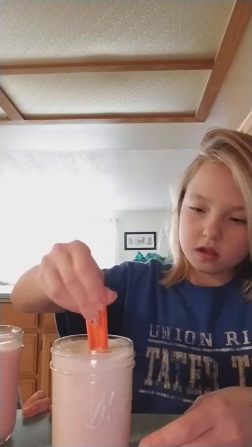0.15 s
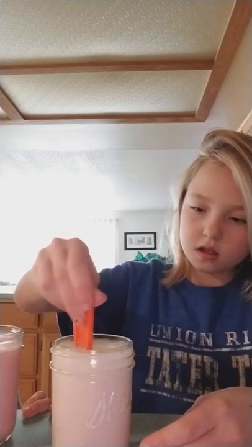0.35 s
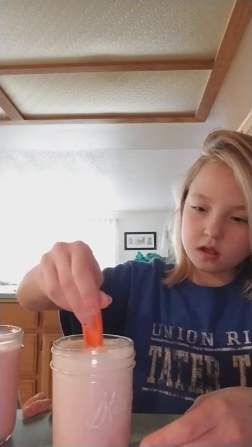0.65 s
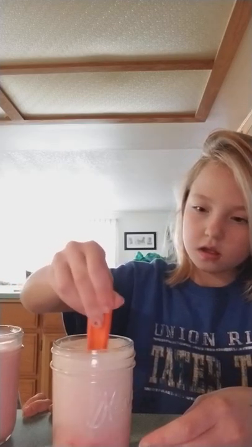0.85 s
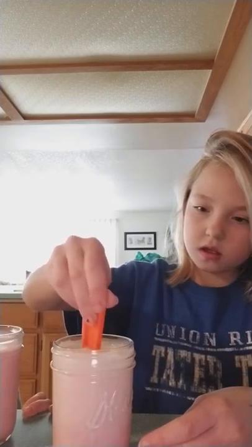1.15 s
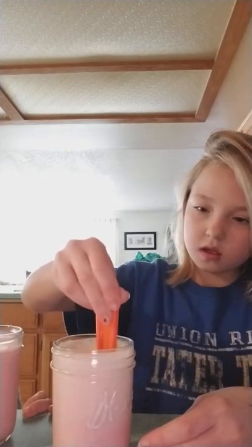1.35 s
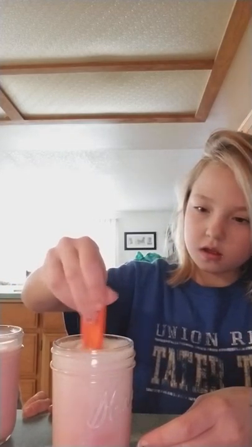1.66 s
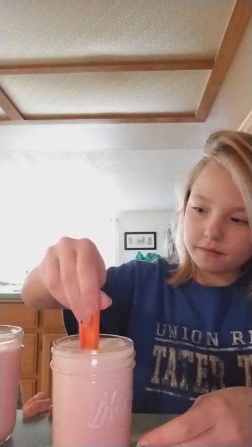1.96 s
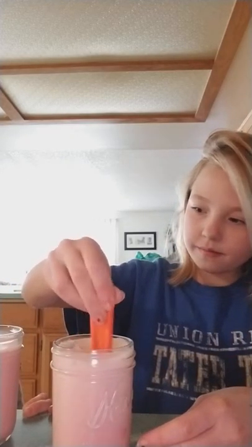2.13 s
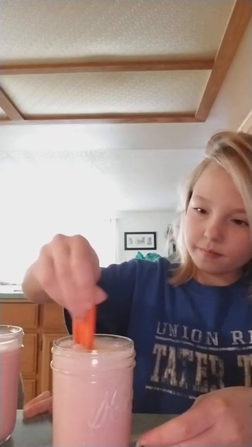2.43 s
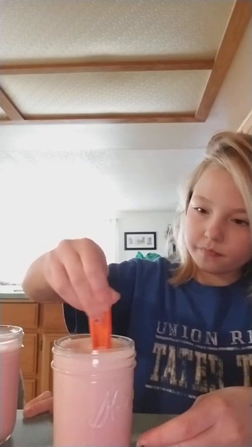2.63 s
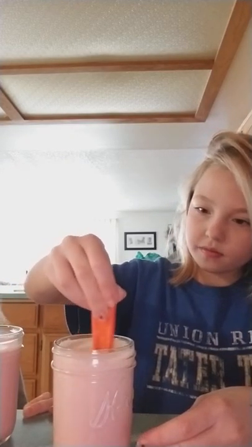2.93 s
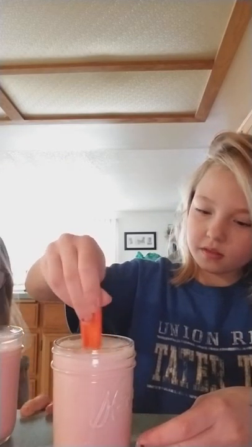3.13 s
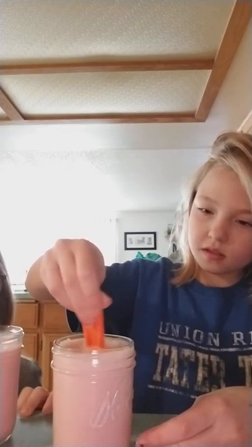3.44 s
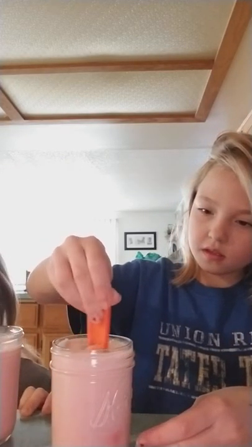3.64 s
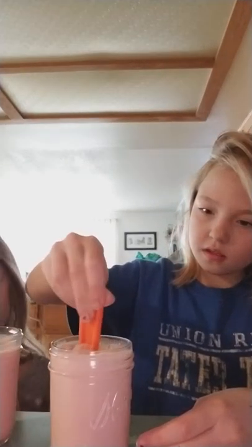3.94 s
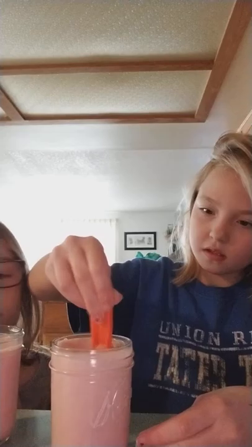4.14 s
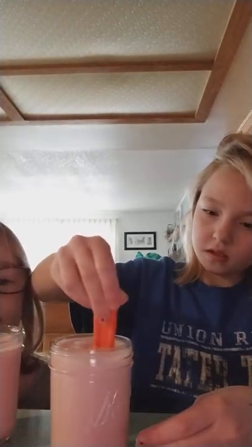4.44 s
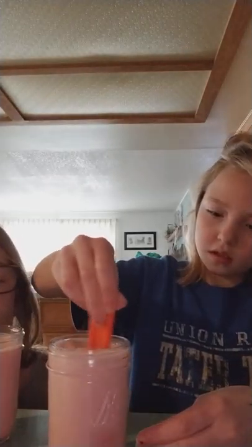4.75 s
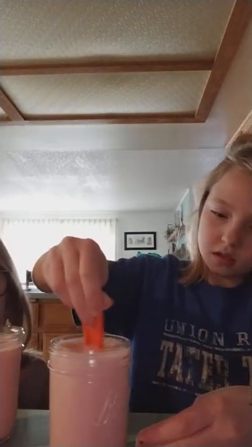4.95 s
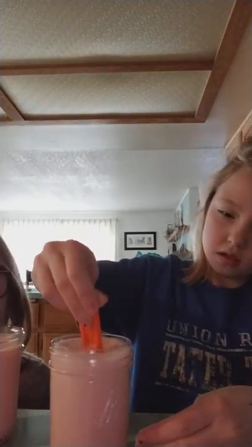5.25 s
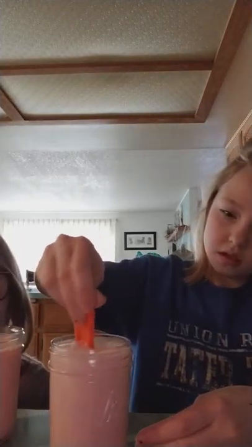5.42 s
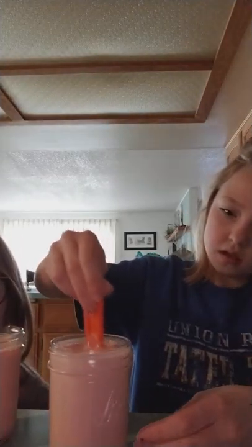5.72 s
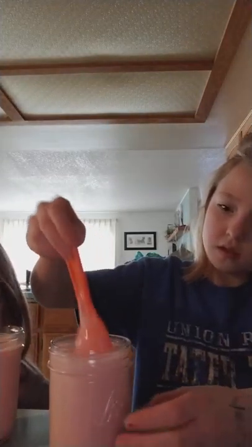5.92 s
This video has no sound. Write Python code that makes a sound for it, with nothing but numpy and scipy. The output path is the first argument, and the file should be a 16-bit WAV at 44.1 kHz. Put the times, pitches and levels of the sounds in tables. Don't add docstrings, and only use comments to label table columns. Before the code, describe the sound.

A plastic spoon stirs a milk-filled glass jar, clacking about five times a second, in a quiet, faintly rumbling kitchen.

```python
import sys
import numpy as np
from scipy import signal
from scipy.fft import rfft, irfft
from scipy.io import wavfile

SR = 44100
rng = np.random.default_rng(int(sys.argv[2]) if len(sys.argv) > 2 else 0)


def to_wav(sig):
    pcm = np.clip(np.atleast_2d(sig), -1, 1) * 32767
    pcm = np.round(pcm).astype(np.int16)
    wavfile.write(sys.argv[1], SR, pcm.T)


def convert_level_to_amplitude(level_db):
    exponent = np.asarray(level_db, float) / 20
    return 10 ** exponent


N = 268128


def clicks(s, gains):
    out = np.full(N, 1e-18)
    np.add.at(out, np.round(np.asarray(s) * SR).astype(int), gains)
    return out


def ring(x, hz, t60):
    r = convert_level_to_amplitude(-60 / (t60 * SR))
    w = 2 * np.pi * hz / SR
    return signal.lfilter([0, np.sin(w)], [1, -2 * r * np.cos(w), r * r], x)


def resonances(x, table):
    out = 0
    for k, (hz, width_hz, db) in enumerate(table):
        r = np.exp(-np.pi * width_hz / SR)
        poles = [1, -2 * r * np.cos(2 * np.pi * hz / SR), r * r]
        peak = signal.lfilter([(1 - r * r) / 2, 0, (r * r - 1) / 2], poles, x)
        out = out + (-1) ** k * convert_level_to_amplitude(db) * peak
    return out


def swell(x, rise_s):
    r = np.exp(-1 / (rise_s * SR))
    return signal.lfilter([(1 - r) ** 2], [1, -2 * r, r * r], x)


def scuff(s, db, tick_db, fast_s, slow_s, slow_db):
    hit = swell(clicks(s, convert_level_to_amplitude(db)), 0.00027)
    fast, slow = [signal.lfilter([1], [1, -np.exp(-1 / (tau * SR))], hit) for tau in (fast_s, slow_s)]
    noise = (fast + convert_level_to_amplitude(slow_db) * slow) * rng.standard_normal(N)
    return noise + clicks(s + 0.00065, convert_level_to_amplitude(db + tick_db))


def colour(x, points):
    hz, db = np.transpose(points)
    grid = np.maximum(np.arange(2049) * SR / 4096, 1)
    cepstrum = irfft(np.log(convert_level_to_amplitude(np.interp(np.log(grid), np.log(hz), db))))
    cepstrum[1:2048] *= 2
    cepstrum[2049:] = 0
    return signal.fftconvolve(x, irfft(np.exp(rfft(cepstrum))))[:N]


def wobble(size, rate_hz):
    knots = rng.standard_normal(int(size * 400 / SR) + 2)
    return np.interp(np.arange(size) * np.clip(rate_hz, 10, 400) / SR, np.arange(len(knots)), knots)


def struck(notes, rise_s, rough, t):
    sound = 0
    for hz, db, t60 in notes:
        sway = 1 + rough * wobble(len(t), 170) * (1 - np.exp(-t / 0.0013))
        sound = sound + convert_level_to_amplitude(db - 60 * t / t60) * sway * np.sin(2 * np.pi * (hz * t + rng.random()))
    return sound * (1 - np.exp(-t / rise_s))


def burst(s, length, rise_s, fall_s):
    t = np.arange(N) / SR
    rise = 1 + np.exp((s - t).clip(-.3, .3) / rise_s * 4)
    fall = 1 + np.exp((t - s - length).clip(-.3, .3) / fall_s * 4)
    return 1 / rise / fall


def looked_up(table, s, plain):
    out = np.tile(np.array(plain, float), (len(s), 1))
    for row_s, *values in table:
        out[np.argmin(abs(s - row_s))] = values
    return out


# [t/s, level/dB]
MOVING = [(0.0, -62.5), (0.46, -63), (0.64, -71.5), (1.29, -72.5), (1.44, -71), (2.15, -69.5), (2.3, -58.5),
          (2.52, -73), (2.68, -76.5), (2.83, -59), (3.3, -62.5), (3.73, -59), (4.2, -62), (4.57, -61.5),
          (5.57, -64), (5.96, -65.5), (6.08, -69)]
# [f/Hz, level/dB per Hz]
AIR_LEFT = [(30, -11), (45, 0.5), (70, -5.5), (100, -3), (200, 3), (450, -15), (1100, -26), (1500, -26.5),
            (4000, -24.5), (8000, -33), (9300, -15.5), (11000, -21.5), (15500, -18)]
AIR_RIGHT = [(30, -0.5), (200, -8), (340, -10.5), (425, -2), (520, -4.5), (1100, -19), (1400, -17),
             (2500, -12), (4000, -18.5), (6000, -8), (7400, -31), (9600, -13), (11700, -18.5), (15500, -16)]


def air():
    self_noise_db = -75.5
    moving_db = np.interp(np.arange(N) / SR, *np.transpose(MOVING))
    shared, left, right = rng.standard_normal((3, N))
    rumble = convert_level_to_amplitude(moving_db + 2.2 * wobble(N, 11))
    slosh = convert_level_to_amplitude(-72.5 + 1.5 * (moving_db + 62.5) + 4 * wobble(N, 25))
    hiss = convert_level_to_amplitude(-71 + 0.68 * (moving_db + 63.5))
    low, mid, high, top = [signal.butter(4, hz, kind, fs=SR, output="sos") for hz, kind in
                           ((330, "low"), ([330, 900], "band"), ([900, 8000], "band"), (8000, "high"))]
    house = colour(shared, AIR_LEFT)
    out = []
    for own, points in ((left, AIR_LEFT), (right, AIR_RIGHT)):
        port = colour(own, points)
        steady = signal.sosfilt(top, port)
        out.append(signal.sosfilt(low, house + port * 0.53) * rumble * convert_level_to_amplitude(20.0)
                   + signal.sosfilt(mid, port) * slosh * convert_level_to_amplitude(26.5)
                   + signal.sosfilt(high, port) * hiss * convert_level_to_amplitude(24.0)
                   + steady / steady.std() * convert_level_to_amplitude(self_noise_db))
    return np.array(out)


# [f/Hz, level/dB, T60/s]
LEFTOVER = [(708, -27.5, 0.047), (422, -33.5, 0.17), (2020, -41.5, 0.27)]


def earlier_ring():
    return sum(ring(clicks([0], convert_level_to_amplitude(db)), hz, t60) for hz, db, t60 in LEFTOVER)


# [t/s, level/dB, wall ring level/dB, lean from handle to bowl/dB, note f/Hz]
FAR = [(0.222, -18, -52, 19.5, 3110), (.601, -18, -35.5, -34.5, 1590), (1.0155, -18.5, -40.5, 27.5, 2540),
       (1.45, -22, -34.5, 14.5, 1445), (1.8504, -22, -32, 6.5, 1280), (2.278, -17, -29.5, 14.5, 3260),
       (2.676, -17, -44, 12.5, 3000), (3.0582, -17, -30, 25, 2570), (3.4257, -17.5, -39, 13, 2570),
       (3.805, -20.5, -34, -8, 1430), (4.1885, -15.5, -70, 36, 3330), (4.5506, -18, -29, 9, 2130),
       (4.9126, -15, -25.5, 8.5, 2570), (5.3023, -16.5, -46, 7.5, 2860)]
# [t/s, level/dB, wall ring level/dB, lean/dB, note f/Hz]
NEAR = [(0.0237, -39.5, -40, -18.5, 680), (0.4105, -25.5, -35.5, 9, 2440), (0.845, -52.5, -53, -21, 1380),
        (1.2181, -34.5, -44.5, -5, 1022), (1.6512, -35.5, -36, -6, 3210), (2.0588, -32, -44.5, 2, 783),
        (2.4982, -30, -29, -3, 1343), (2.8629, -28.5, -31, -2, 2630), (3.2719, -35.5, -39.5, 2.5, 2540),
        (3.5988, -29, -30, -1, 4030), (4.0111, -32, -36, 2, 2630), (4.3899, -31.5, -56, -3, 3420),
        (4.7386, -23, -47, 4.5, 2050), (5.106, -38.5, -45.5, 2.5, 2990), (5.4951, -29, -39, -6, 915),
        (5.7012, -43.5, -56.5, -13, 1182)]
# [t/s, level/dB, wall ring level/dB, lean/dB, note f/Hz]
BOUNCES = [(0.0697, -54, -64.5, 10, 3190), (0.1173, -40.5, -30.5, -16.5, 706),
           (0.4553, -32.5, -37, 12, 2260), (0.9007, -54.5, -50.5, -8, 1240),
           (1.276, -36.5, -43.5, -24, 1210), (1.6937, -39, -36, -19, 853), (1.7225, -48, -56, 11, 2680),
           (2.0938, -34, -52, -1.5, 834), (2.5322, -30, -63, 1, 3010), (2.5542, -40.5, -71, 4.5, 850),
           (2.8919, -33.5, -42.5, -10, 1120), (3.2997, -44.5, -61, -27, 850), (3.6359, -36, -65, -22, 1010),
           (4.4142, -43, -39, -27, 1200), (4.7729, -29, -39.5, -1, 1010), (5.5425, -33, -63, -2, 2880),
           (5.5649, -38.5, -73, 0, 3220)]
# [t/s, level/dB, lean/dB, note f/Hz]
TOUCHES = [(0.529, -55.5, 2, 3330), (0.97, -59, 5, 3070), (1.706, -48.5, 8, 2900), (2.017, -70, -18, 1140),
           (5.585, -59, -3, 2750), (1.3722, -65.5, 14, 2800), (2.605, -42.5, 0, 3040),
           (2.629, -46, -16, 651), (3.0097, -49.5, 1, 2830), (3.3641, -41.5, 1, 3140),
           (3.694, -43.5, -2, 3020), (3.73, -69, 16, 713), (4.033, -39, 0.5, 3000),
           (4.136, -33.5, -3.5, 1376), (4.8621, -54, 23.5, 3030), (5.236, -49.5, 41.5, 2930),
           (5.8038, -54.5, 3, 2570)]
# [t/s, extra level/dB]
JOLTS = [(.023, 6.5), (.222, 9.5), (1.652, 7), (1.85, 12), (2.499, 9), (2.892, 4.5), (3.599, 7), (4.189, 0),
         (4.39, 16.5), (4.414, 12), (4.551, 3), (4.773, 5), (.455, -3.5), (1.276, -3.5)]
# [t/s, level moved from body to sharp/dB]
EDGES = [(.07, -12), (.222, 1.5), (.455, -4.5), (1.45, 2.5), (1.85, -2), (2.278, -2), (2.499, 7),
         (2.532, -3), (3.426, -4), (3.805, 3), (4.39, 3), (4.551, -3), (4.74, -3.5), (5.106, -6.5),
         (5.302, 1), (5.495, 2.5), (1.219, -4), (.968, 16), (.53, 13.5), (5.805, 19), (1.016, -3),
         (4.033, 9), (1.372, -17), (.025, -5.5)]
BODY_DB, SHARP_DB, TOP_DB = (-1.46, -2.5, 1, -9.5), (1.5, 0.5, -0.5, -14), (-9.5, -16, -18, -31.5)
HANDLE_DB, BOWL_DB = (-2.2, -1, 1.6, 1), (-4, 0, 3, 1.7)
HUM_DB = (-51.5, -46.5, -40.5, -44)
WALL_T60_S, WALL_MUTING_S = (0.27, .25, 0.2, 0.21), (4.14, 7.4, 10, 8.0)
HANDLE_HZ, BOWL_HZ = (1298, 1131, 1200, 1090), (2800, 2770, 2650, 3030)


def contacts():
    hum_follows, hum_fade_db_per_s = 0.55, 1.78
    touches = [(s, db, db - 23.5, lean_db, hz) for s, db, lean_db, hz in TOUCHES]
    rows = sorted((*row, kind) for kind, table in enumerate((FAR, NEAR, BOUNCES, touches)) for row in table)
    s, db, wall_db, lean_db, hz, kind = np.transpose(rows)
    by_kind = (BODY_DB, SHARP_DB, TOP_DB, HANDLE_DB, BOWL_DB, HUM_DB,
               WALL_T60_S, WALL_MUTING_S, HANDLE_HZ, BOWL_HZ)
    body, sharp, top, handle, bowl, hum, t60, muting_s, handle_hz, bowl_hz = [
        np.array(values)[kind.astype(int)] for values in by_kind]
    handle_db = db + handle - 10 * np.log10(1 + convert_level_to_amplitude(2 * lean_db))
    bowl_db = db + bowl - 10 * np.log10(1 + convert_level_to_amplitude(-2 * lean_db))
    hum_db = hum + hum_follows * (db + 27.5) - hum_fade_db_per_s * s
    for jolt_s, more_db in JOLTS:
        hum_db[np.argmin(abs(s - jolt_s))] += more_db
    for edge_s, moved_db in EDGES:
        k = np.argmin(abs(s - edge_s))
        body[k] -= moved_db
        sharp[k] += moved_db
    top_db = db + top + 0.18 * (db + 18.0)
    low = hz < 1900
    return (s, db + body, db + sharp, top_db, wall_db, hum_db, handle_db, bowl_db,
            np.where(low, hz, handle_hz), np.where(low, bowl_hz, hz), t60 * np.exp(-s / muting_s))


# [f/Hz, width/Hz, level/dB]
COUNTER = [(120, 34, -5.5), (232, 220, 0.26)]


def counter():
    fridge_hz, fridge_width_hz, fridge_db = 98, 21, -70.5
    drone = resonances(rng.standard_normal(N), [(fridge_hz, fridge_width_hz, 0)])
    rows = contacts()
    s, hum_db = rows[0], rows[5]
    lumps = resonances(scuff(s + 0.0031, hum_db + 10.5, 3, 0.02, 0.064, -14.0), COUNTER)
    return lumps + drone / drone.std() * convert_level_to_amplitude(fridge_db)


# [t/s, level/dB]
GRAZES = [
    (.002, -40),
    (2.84, -56.5),
    (3.041, -50),
    (3.523, -58),
    (3.993, -59.5),
    (4.503, -75),
    (5.48, -50),
]
# [t/s, 4 kHz shoulder level/dB, lean from 5 to 6 kHz/dB, 9 kHz rim level/dB, top level/dB]
PLACES = [(.222, 5, -3, 2.5, 3), (.411, -5.5, -2.5, -3.5, -11), (.455, -3, 2.5, -2, -0.5),
          (.601, 0, -1.5, 0, 0.5), (1.016, 1, -5.5, 3, -1.5), (1.219, 3, 1.5, 1.5, -9),
          (1.276, 0, -3, 6, -7), (1.45, 6.5, 0.5, -4, 5.5), (1.651, 4, -0.5, 0, -4.5),
          (1.85, -1, -3.5, 1, -6), (2.058, 6, 10, 7.5, -16), (2.278, -5, 3, 2, -10),
          (2.498, 11, -10.5, 8.5, 4.5), (2.532, 2.5, 1, -0.5, -5.5), (2.676, -1.5, 2, -4.5, -1),
          (2.863, 4, -7, -9.5, -7.5), (3.058, -11, 6, -1, 2), (3.272, -1, -3.5, -1.5, -6),
          (3.426, -4, -3.5, 2, 1.5), (3.599, 6.5, -9.5, 8, -10), (3.805, 8, -3.5, 2, 6),
          (4.012, 6.5, -4, -4, -8), (4.189, 5, -0.5, -9, -1), (4.39, 7.5, -1.5, 1, -17),
          (4.551, -6, -2, -6, 1.5), (4.739, -1.5, -1, -1.5, -13), (4.773, 1, 4, 7.5, 1),
          (4.913, -2, 2.5, -6.5, -0.5), (5.302, -4, 4, 1, 3), (5.495, -7, -1, 3, -2), (5.543, 5, 3, -1, -2)]
# [f/Hz, width/Hz, level/dB]
DULL = [(725, 270, -1.4), (1196, 200, -1.3)]
BODY = [(2108, 630, -2), (2540, 576, 2.5), (3024, 490, 2), (4080, 490, -6)]
SHARP = [(5131, 274, -1), (5285, 630, -7), (6124, 111, -7)]
TOP = [(7380, 100, -12), (9450, 300, 8), (9900, 1300, -9.5), (11690, 1000, -5), (14600, 2300, -19)]
# [f/Hz, width/Hz, level/dB]
SPLASH = [(8600, 2500, -3.5), (13500, 6000, -3)]


def crack():
    s, body_db, sharp_db, top_db, _, _, handle_db, _, handle_hz, _, _ = contacts()
    graze_s, graze_db = np.transpose(GRAZES)
    latest = np.maximum(np.searchsorted(s, np.arange(N) / SR + .001) - 1, 0)
    shoulder, lean, rim, high = convert_level_to_amplitude(looked_up(PLACES, s, (0, 0, 0, 0))[latest].T)
    deep_db = handle_db - np.maximum(handle_hz - 950, 0) / 30
    dull = scuff(s, deep_db + 8.5, 18.2, 0.0051, 0.02, -7.5)
    body = scuff(s, body_db + 9, 18.0, 0.0038, 0.024, -15)
    body = body + scuff(graze_s, graze_db + 14.0, 3.4, 0.00098, 0.0086, -2.5)
    sharp = scuff(s, sharp_db + 20.5, 20.17, 0.0034, 0.0065, -17.5)
    top = scuff(s, top_db + 15, 10.0, 0.0018, 0.0069, -25.5)
    splash = scuff(s, top_db - 11.5, -9, 0.005, 0.017, -6)
    return (resonances(splash * high, SPLASH) + resonances(dull, DULL)
            + resonances(body, BODY[:3]) - resonances(body * shoulder, BODY[3:])
            + resonances(sharp / np.sqrt(lean), SHARP[:2]) + resonances(sharp * np.sqrt(lean), SHARP[2:])
            + resonances(top * rim, TOP[:3]) - resonances(top * high, TOP[3:]))


def spoon():
    out, t = np.zeros(N + 5000), np.arange(5000) / SR
    for s, *_, handle_db, bowl_db, handle_hz, bowl_hz, _ in np.transpose(contacts()):
        notes = [(handle_hz, handle_db, .035),
                 (bowl_hz, bowl_db + 1.0, .035),
                 (bowl_hz * rng.uniform(0.95, .99), bowl_db + 0.1, .035)]
        out[round(s * SR):][:len(t)] += struck(notes, 0.00042, 0.84, t)
    return out[:N]


# [f/Hz, level/dB, T60/s]
GLASS = [(5040, -18, 0.03), (5700, -34, 0.061), (5300, -24.5, 0.051), (6120, -33, 0.23), (6010, -16, 0.08),
         (6310, -24, 0.048)]
# [f/Hz, level/dB, share of the knock's ring time]
WALL = [(1955, -3, 0.99), (1984, -6.5, 0.95)]
# [f/Hz, level/dB, T60/s]
HUM = [(421.9, 4.5, 0.14), (431.2, -14.5, 0.3), (346.6, 1.5, 0.065), (529, -4.5, 0.069), (195.4, -7, 0.1)]
# [t/s, ring time factor, second note extra level/dB, time until milk or hand stops it/s]
RINGS = [(.025, 0.67, 2, 0.068), (.118, 0.31, 0, 0.049), (.411, 0.88, 1.5, .1), (.455, 1.1, 0, 0.081),
         (.601, 1.2, 3.5, 0.08), (.9, 1.5, -7, 0.04), (1.016, 2.9, -1, 0.085), (1.219, 0.97, 4.5, 0.043),
         (1.276, 0.54, 6, .045), (1.45, 1.8, -21, 0.165), (5.106, 0.7, 4, .03), (1.651, 1.3, -9, 0.038),
         (1.694, 0.54, 1, 0.025), (1.85, 0.65, 6.5, 0.043), (2.278, 0.78, 0.5, .12),
         (2.676, 2.8, -1.5, 0.21), (2.863, 1.1, -12, .058), (3.058, 2, -10, 0.14), (2.892, 1.6, -9, 0.017),
         (3.599, 1, -1, 0.057), (4.414, 1.3, -9.5, 0.052), (3.272, 1.05, -4, 0.045), (4.551, 0.66, -1, .05)]


def jar():
    out, t = np.zeros(N + 9000), np.arange(9000) / SR
    rows = np.transpose(contacts())
    all_s = rows[:, 0]
    leans = looked_up(PLACES, all_s, (0, 0, 0, 0))[:, 1]
    rings = looked_up(RINGS, all_s, (1, 0, .15))
    next_s = [*all_s[1:], N / SR]
    for row, after, lean_db, (longer, second_db, free_s) in zip(rows, next_s, leans, rings):
        s, _, sharp_db, _, wall_db, hum_db, *_, wall_t60 = row
        glass = [(hz, db + lean_db / 2 * np.sign(hz - 5700), t60) for hz, db, t60 in GLASS]
        wall = [WALL[0], np.add(WALL[1], (0, second_db, 0))]
        parts = (   # notes, dB, rise s, random detuning, roughness, ring time factor, random dB
            (glass, sharp_db + 4.5, .0004, .008, .6, 1, 1.8),
            (wall, wall_db + 2.0, .004, .003, .25, wall_t60 * longer, .4),
            (HUM, hum_db + 8.0, .004, .008, .35, 1, 1.2))
        sounds = []
        for modes, db, rise_s, detune, rough, held, spread_db in parts:
            notes = [(hz * (1 + detune * rng.standard_normal()),
                      db + mode_db + spread_db * rng.standard_normal(),
                      t60 * held) for hz, mode_db, t60 in modes]
            sounds.append(struck(notes, rise_s, rough, t))
        sounds[1] = sounds[1] * np.exp(-np.maximum(t - free_s, 0) / .012)
        damping = np.exp(-np.maximum(t + s - after, 0) / 0.03)
        out[round(s * SR):][:len(t)] += sum(sounds) * damping
    return out[:N]


# [f/Hz, T60/s]
KITCHEN_T60_S = [(300, 0.32), (1200, 0.35), (3000, 0.23), (7000, 0.23), (14000, 0.088)]


def kitchen(x):
    t, tail = np.arange(SR // 3) / SR, 0
    for hz, t60 in KITCHEN_T60_S:
        band = signal.butter(1, [hz / 1.6, min(hz * 1.6, 20000)], "band", fs=SR, output="sos")
        tail = tail + signal.sosfilt(band, rng.standard_normal((2, len(t)))) * convert_level_to_amplitude(-60 * t / t60)
    tail = tail * (1 - np.exp(-(t / 0.00065) ** 2))
    return signal.fftconvolve(x[None], tail / 15, axes=1)[:, :N]


# [t/s, f/Hz, level/dB, T60/s]
LINGERING = [(.1175, 538, -42.5, 0.12), (.222, 533, -32.5, 0.13), (.601, 1440, -44.5, 0.28),
             (.601, 2735, -38, 0.098), (.972, 1970, -53.5, 0.42), (1.0155, 2400, -24, 0.064),
             (.4105, 3480, -39.5, .06), (.222, 5140, -29.5, 0.17), (1.694, 790, -42.5, .2),
             (1.85, 1295, -45, 0.18), (1.85, 2400, -39.5, 0.21), (2.278, 2110, -32.5, 0.067),
             (2.278, 2420, -31, .08), (2.278, 422.8, -38, 0.16), (2.532, 895, -44, 0.14),
             (2.532, 2476, -37.5, 0.11), (2.629, 600, -38.5, 0.052), (2.676, 6013, -17.5, .08),
             (2.863, 5140, -30.5, 0.12), (2.863, 2503, -30.5, 0.07), (2.863, 6010, -37.5, 0.16),
             (3.058, 2090, -27.5, .07), (3.058, 2299, -29, 0.08), (3.4257, 1283, -29.5, 0.086),
             (3.4257, 2314, -27.5, 0.097), (3.4257, 6175, -27, 0.056), (3.805, 1670, -34, 0.097),
             (3.805, 1293, -41.5, 0.22), (3.805, 2710, -34, 0.1), (4.1885, 3880, -26.5, 0.046),
             (4.1885, 1943, -41, 0.16), (4.5505, 2390, -27.5, 0.1), (4.5505, 2630, -30, 0.054),
             (4.5505, 2146, -37.5, 0.27), (4.7387, 1040, -33.5, 0.053), (4.7387, 1976, -36, .15),
             (4.9126, 2514, -33, 0.16), (4.9126, 3310, -27.5, .06), (4.9126, 885, -41.5, 0.19),
             (5.106, 338, -42, 0.075), (5.3023, 5087, -16.5, 0.037), (4.1885, 5080, -15, 0.041),
             (5.3023, 1038, -48.5, 0.29), (5.3023, 2730, -40, 0.19), (5.3023, 1930, -33.5, .07),
             (5.495, 5400, -26, 0.055), (5.495, 3240, -38, .06)]


def lingering():
    out, t, contact_s = np.zeros(N + 9000), np.arange(9000) / SR, contacts()[0]
    for s, hz, db, t60 in LINGERING:
        start = contact_s[np.argmin(abs(contact_s - s))]
        out[round(start * SR):][:len(t)] += struck([(hz, db, t60)], .0012, .6, t)
    return out[:N]


# [t/s, f/Hz, level/dB re strength]
OVERTONES = [(0.2212, 3710, 1), (0.6, 2770, -5.5), (1.0161, 2626, 5.5), (1.4502, 2950, -17),
             (1.8497, 2410, -16), (2.2784, 3200, -4), (2.6762, 2190, -7.5), (3.0579, 2820, 5),
             (3.4266, 3040, 5), (3.8057, 3000, -1), (4.1872, 2480, -7.5), (4.5509, 2500, 4.5),
             (4.7389, 2630, -3.5), (4.9114, 2970, -10), (5.3027, 3040, 1.5)]


def overtones():
    out, t, t60_s = np.zeros(N), np.arange(2000) / SR, .024
    knocks = np.array(FAR + NEAR)
    for s, hz, db in OVERTONES:
        knock_db = knocks[np.argmin(abs(knocks[:, 0] - s)), 1]
        out[round(s * SR):][:len(t)] += struck([(hz, knock_db + db, t60_s)], 0.00068, 0.95, t)
    return out


# [t/s, level/dB, f/Hz]
PLOPS = [
    (.226, -39.5, 774),
    (1.70, -34, 811),
    (2.065, -40, 807),
    (2.10, -37, 826),
    (2.56, -45.5, 867),
    (3.525, -39.5, 533),
    (4.918, -26.5, 890),
]


def plops():
    out, t = np.zeros(N), np.arange(8000) / SR
    rise_per_s, t60_s = 0.44, 0.11
    for s, db, hz in PLOPS:
        gliding_hz = hz * (1 + rise_per_s * t / 2)
        out[round(s * SR):][:len(t)] += struck([(gliding_hz, db, t60_s)], 0.0033, 0.99, t)
    return out


# [start t/s, length/s, level/dB, f/Hz]
RUBS = [
    (1.8, 0.082, -56, 170),
    (2.06, 0.147, -58.5, 163),
    (3.34, 0.093, -59.5, 4140),
    (3.54, 0.08, -46.5, 117),
    (3.517, 0.078, -59, 730),
    (5.5, 0.053, -49.5, 335),
    (5.43, 0.18, -55, 310),
    (5.81, 0.4, -69.5, 1050),
]


def rubs():
    edge_s, width = 0.0059, 0.31
    out, noise = 0, rng.standard_normal(N)
    for s, length, db, hz in RUBS:
        band = resonances(noise, [(hz, width * hz, 0)])
        band = resonances(band, [(hz, 2 * width * hz, 0)])
        left_db = -9 * min(hz / 400, 1)
        out = out + convert_level_to_amplitude([[db + left_db], [db]]) * band / band.std() * burst(s, length, edge_s, edge_s)
    return out


# [start t/s, length/s, level/dB]
RUSTLES = [
    (2.27, .31, -67),
    (2.64, 0.42, -66),
    (3.33, 0.12, -72),
    (3.563, 0.4, -69.5),
    (4.06, 0.14, -72.5),
    (4.73, 0.18, -73.5),
    (5.17, 0.17, -70),
    (6.007, 0.06, -72),
]
# [f/Hz, level/dB per Hz]
RUSTLE = [(900, -8), (1900, -14), (3900, -13), (6000, 1.5), (7300, -16), (9700, 0), (15500, -10.5)]
# [f/Hz, level/dB]
RUSTLE_LEFT = [(1300, -14.5), (4400, -20), (8100, -4), (12000, -3), (15000, -0.5)]


def rustles():
    rise_s, fall_s = 0.07, .025
    shape = sum(convert_level_to_amplitude(db) * burst(s, length, rise_s, fall_s) for s, length, db in RUSTLES)
    left, right = [colour(noise, RUSTLE) for noise in rng.standard_normal((2, N))]
    cloth = np.array([colour(left, RUSTLE_LEFT), right]) / right.std()
    return cloth * shape * convert_level_to_amplitude(9.0 + 1.5 * wobble(N, 12))


# [t/s, level/dB, f/Hz, T60/s]
THUMPS = [
    (2.953, -38.5, 40, 0.4),
    (3.569, -40, 37.8, 0.15),
    (3.824, -27, 39.8, 0.34),
    (2.685, -33.5, 201, 0.17),
    (3.839, -26, 81, 0.13),
    (4.772, -36.5, 138, 0.13),
    (4.946, -28.5, 205, 0.15),
    (5.565, -34.5, 196, 0.15),
]


def thumps():
    push_cycles, out = 1.9, 0
    for s, db, hz, t60 in THUMPS:
        push = clicks([s], convert_level_to_amplitude(db - 8.5) * 14 * hz / (push_cycles * SR))
        out = out + ring(ring(push, hz, push_cycles / hz), hz, t60)
    return out


# [f/Hz, level/dB]
PATH = [(1250, -1), (1490, -6.5), (1750, 1.5), (4000, -2.5), (4500, -2), (4900, 0)]
# [f/Hz, level/dB]
LEFT_PORT = [(150, 3.5), (400, -7), (1200, -12.5), (2500, -17), (4000, -8), (5200, -26.5), (6100, -26),
             (7400, -1.5), (9400, -30.5), (11500, -4), (15000, -9)]


def scene():
    kitchen_db, shaded = -21, 0.44
    plastic = spoon() + plops() + overtones()
    notes = jar() + plastic + earlier_ring()
    small = signal.butter(2, 170, "high", fs=SR, output="sos")
    near, other = signal.sosfilt(small, [colour(crack() + notes, PATH), crack()])
    room = convert_level_to_amplitude(kitchen_db) * kitchen(near - shaded * plastic)
    bed = air() + thumps() + rustles() + counter() + rubs()
    bed = signal.sosfilt(signal.cheby2(14, 60, 15900 + 250, fs=SR, output="sos"), bed)
    near = near + lingering()
    left = colour(0.96 * near + 0.66 * other + convert_level_to_amplitude(9.5) * room[0], LEFT_PORT)
    left = np.roll(left, 2) - 0.26 * np.roll(left, 14)
    return convert_level_to_amplitude(2.0) * np.array([left, near + room[1]]) + bed


def top_cut(x):
    return signal.sosfilt(signal.butter(12, 16570, fs=SR, output="sos"), x)


def record(dry):
    rounded = 1.3 * np.tanh(dry / 1.3)
    cut = signal.sosfilt(signal.cheby2(10, 50, 16900, fs=SR, output="sos"), rounded)
    return top_cut(cut)


dry = scene()
out = record(dry)
to_wav(out)
```